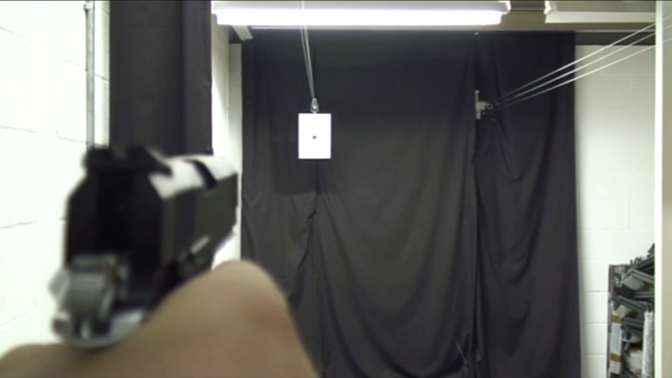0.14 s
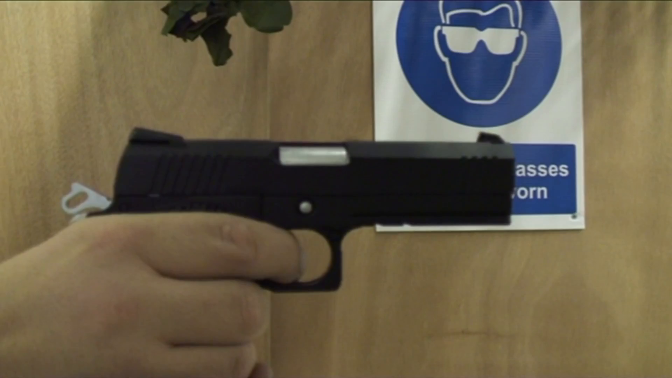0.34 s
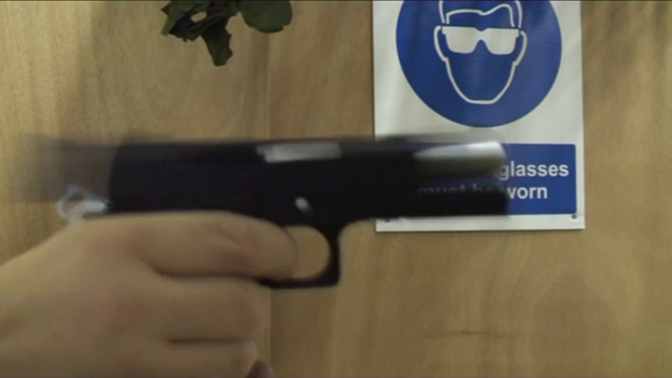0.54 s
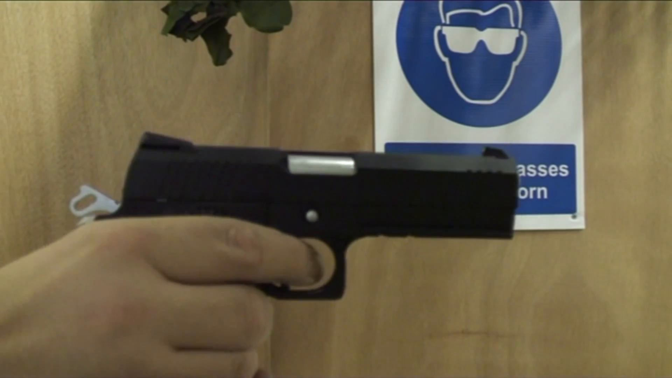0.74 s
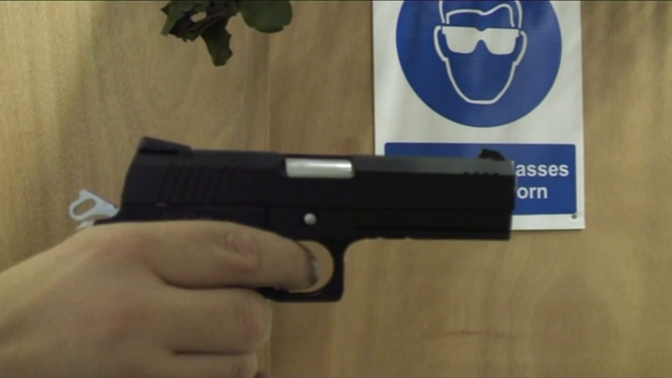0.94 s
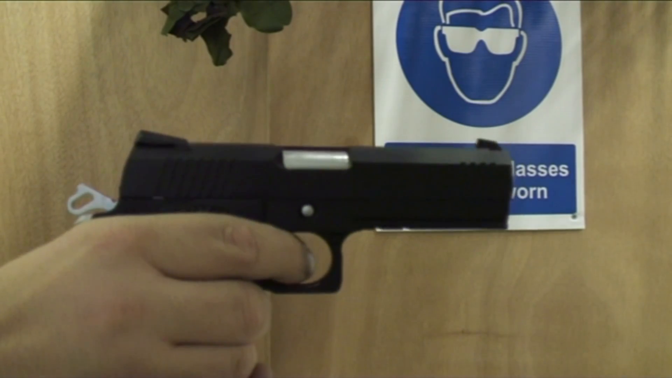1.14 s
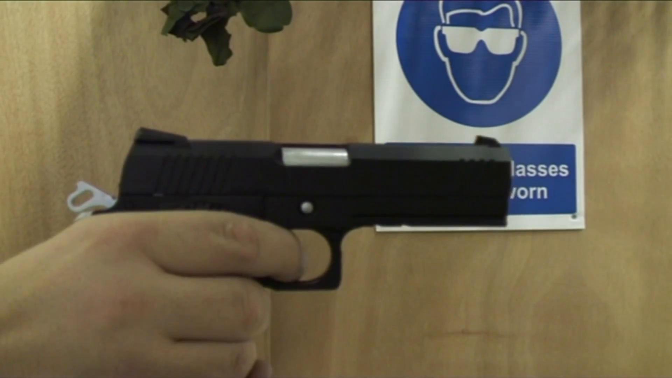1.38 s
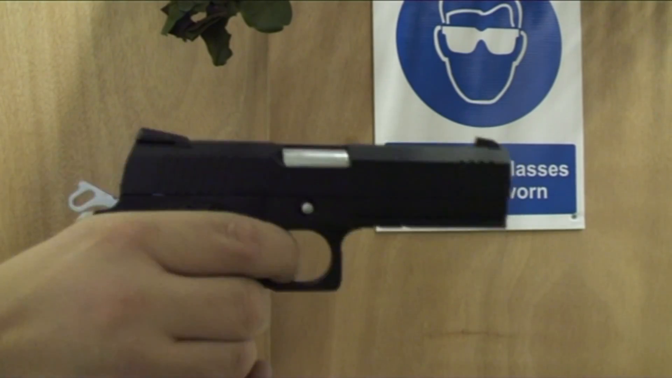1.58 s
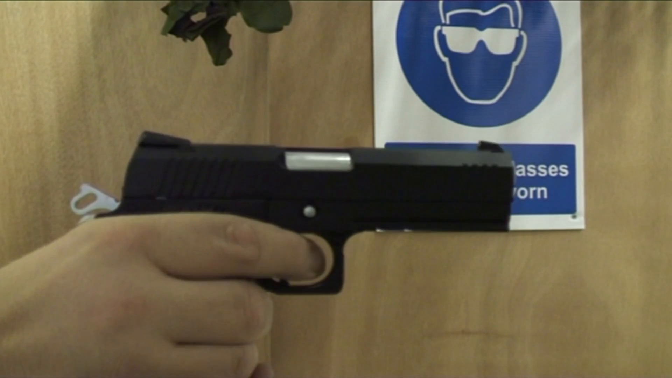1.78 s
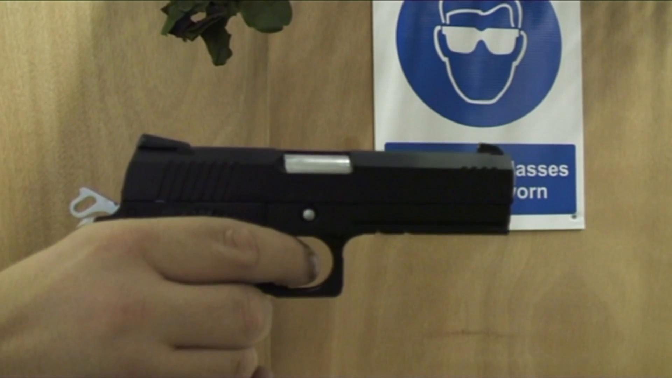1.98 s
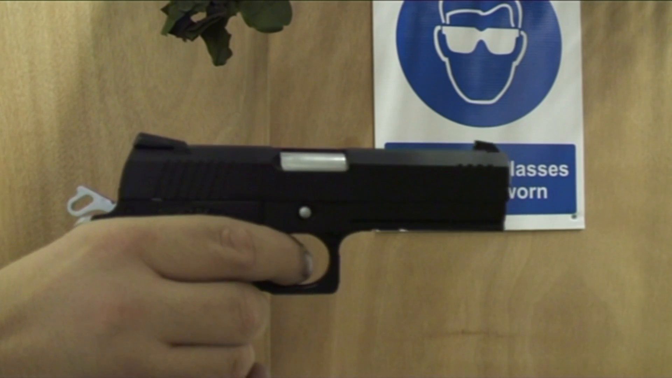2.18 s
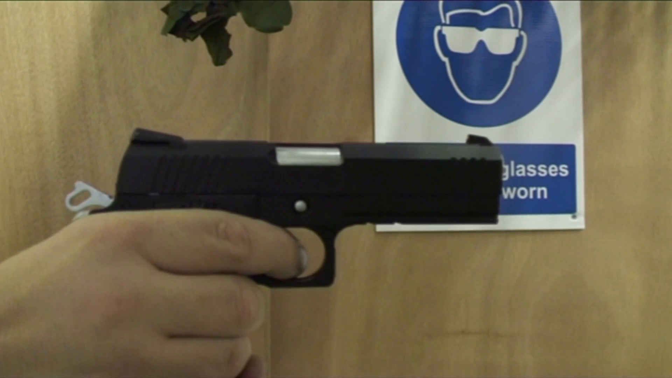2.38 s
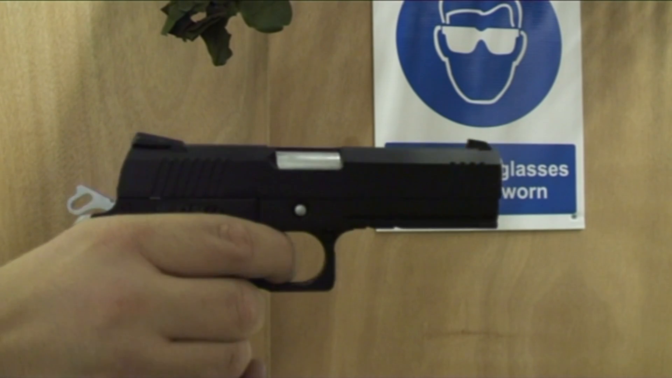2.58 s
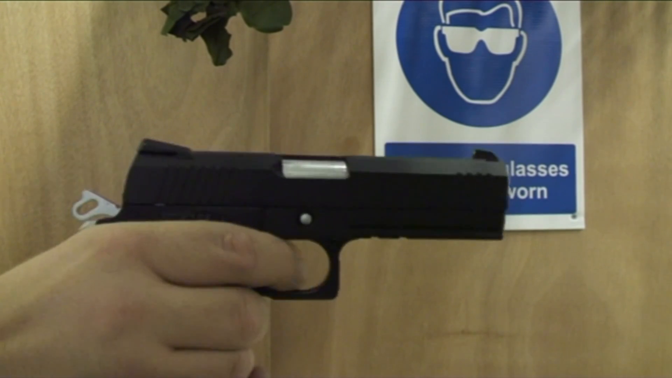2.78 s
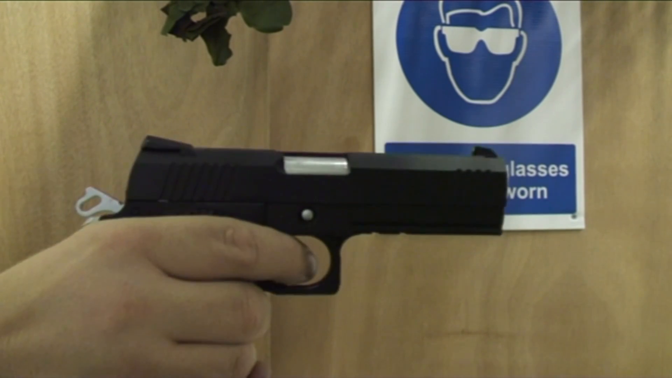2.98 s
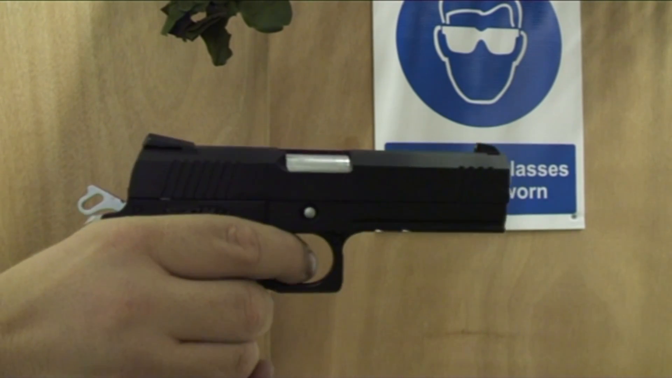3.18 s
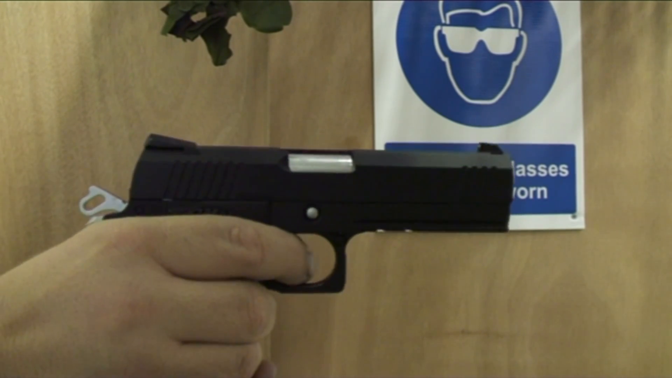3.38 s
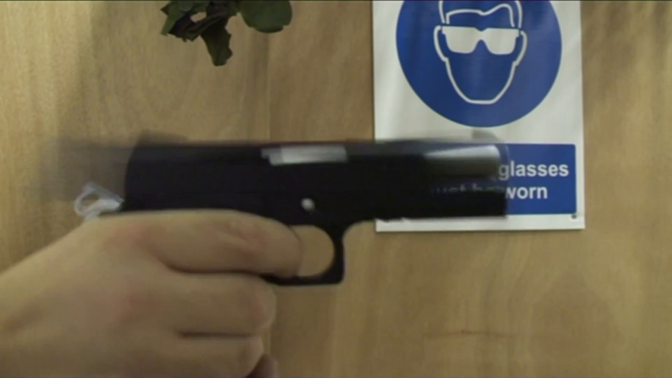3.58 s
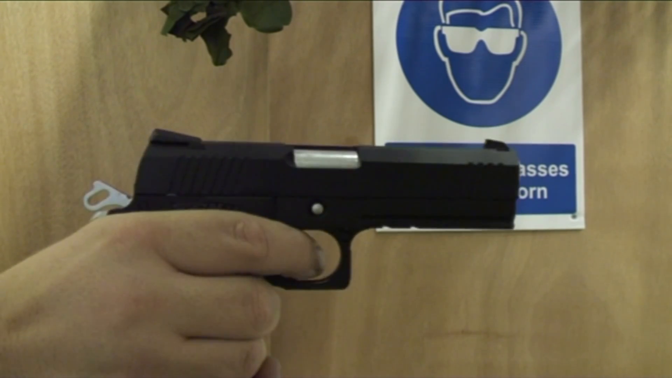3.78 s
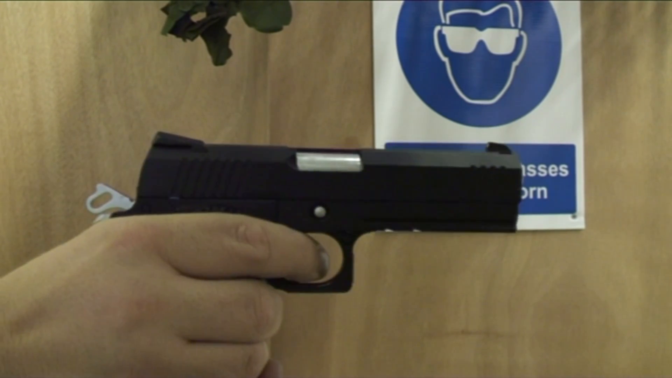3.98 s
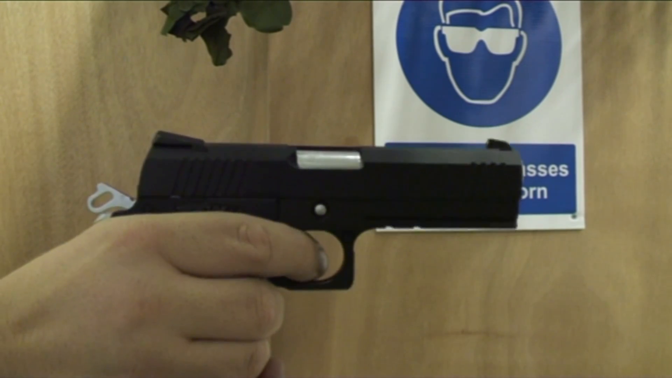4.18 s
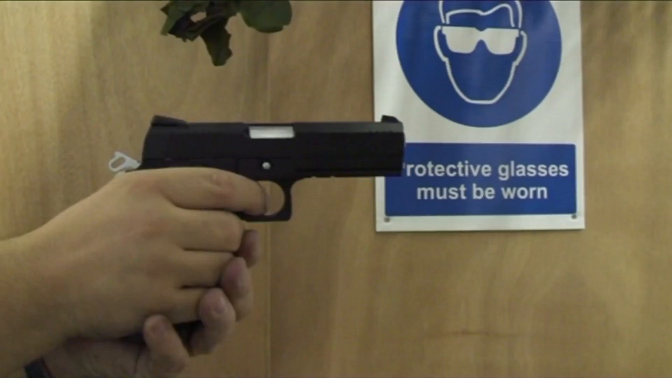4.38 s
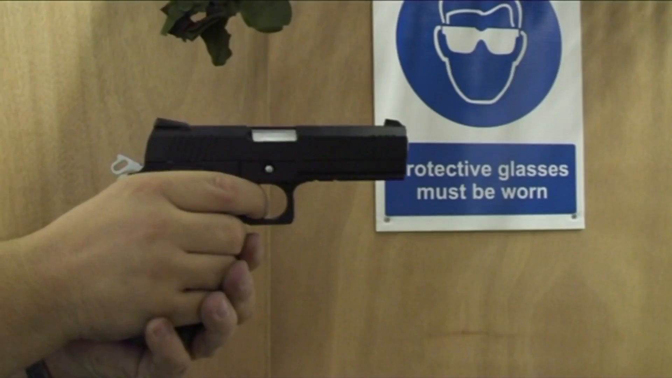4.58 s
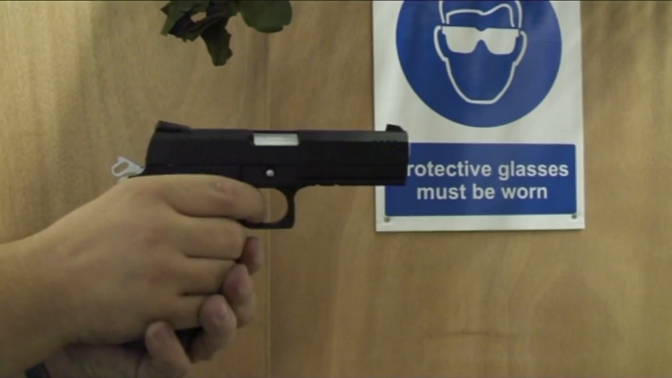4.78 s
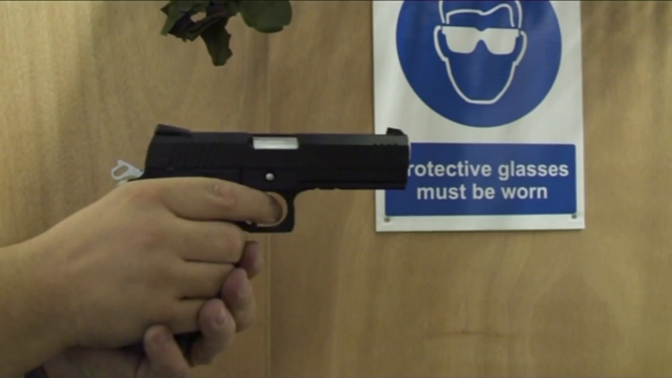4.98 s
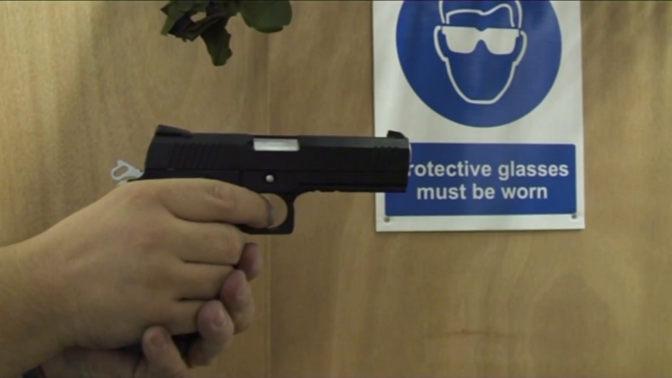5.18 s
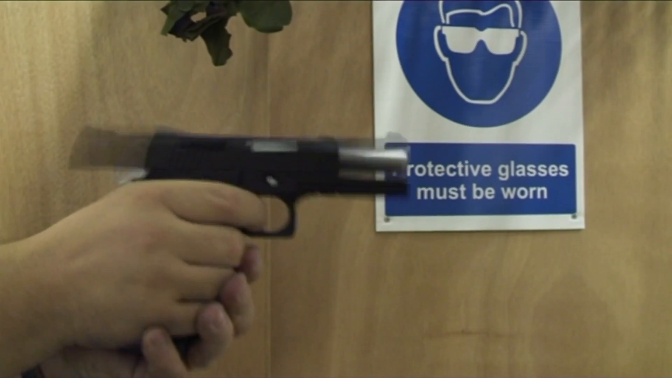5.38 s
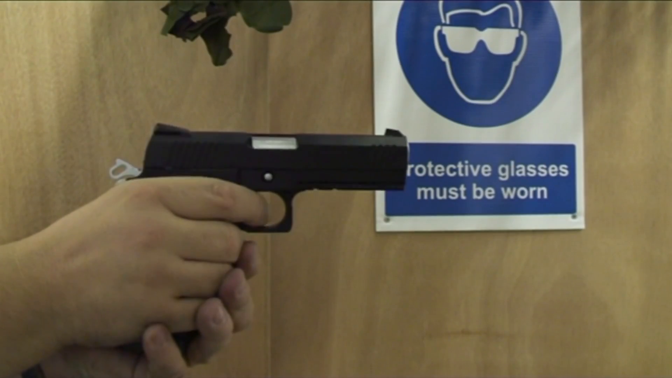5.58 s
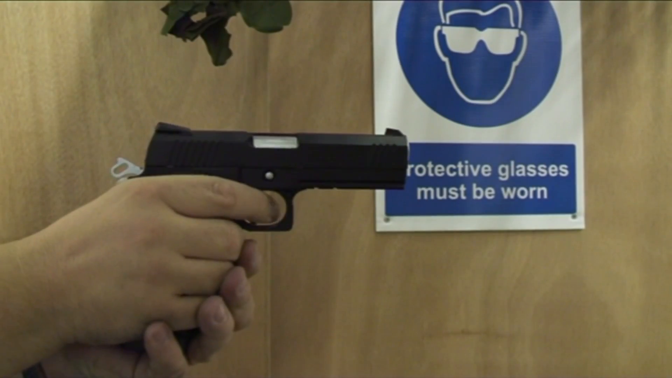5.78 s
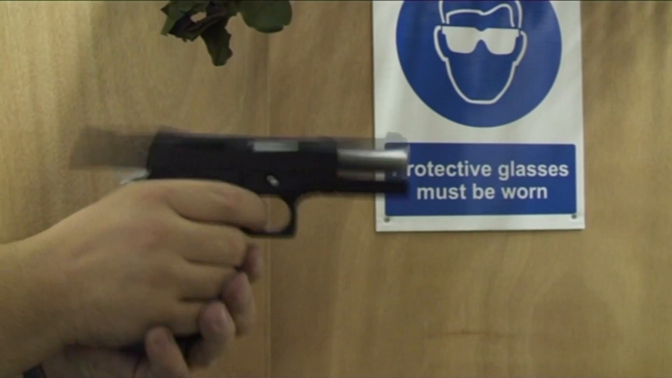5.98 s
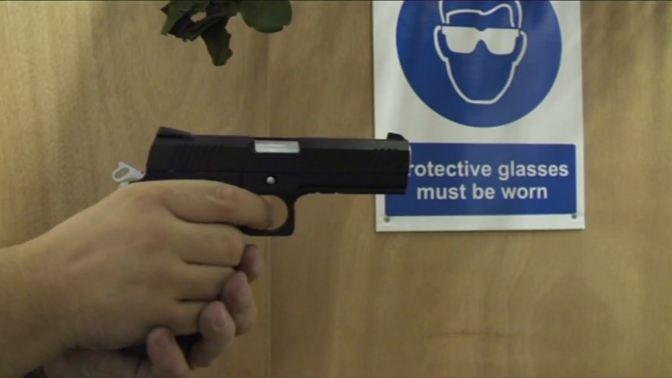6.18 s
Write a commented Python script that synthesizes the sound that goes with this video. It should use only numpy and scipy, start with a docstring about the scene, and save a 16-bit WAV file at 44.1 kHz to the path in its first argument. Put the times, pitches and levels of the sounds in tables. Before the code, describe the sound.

A gas-powered airsoft pistol cracks eight times in a reverberant indoor range, metal slide slamming sharply after each shot over a faint low hum.

```python
"""A pistol shot roars, heard from behind the gun, and its tail stops short; a faint hum, hiss and rumble run on.
Then a gas blowback airsoft pistol fires seven shots down a long indoor range, near an overloading microphone.
Each shot: hammer and slide blows are shaped noise and fading modes; gas bursts are pressure swings with a rush;
the slide feeds a pellet and slams, the range answers from its far end, and the pellet snaps at the target.
Trigger clicks, grip rustles and knocking spent pellets are short shaped noises between the shots."""
import sys
import numpy as np
from scipy import signal
from scipy.fft import rfft, irfft
from scipy.io import wavfile
from scipy.ndimage import uniform_filter1d

SR = 44100
rng = np.random.default_rng(int(sys.argv[2]) if len(sys.argv) > 2 else 0)


def store_pcm(level_fs):
    """Save levels as 16-bit WAV."""
    pcm = np.round(np.clip(level_fs, -1, 1) * 32767).astype(np.int16)
    wavfile.write(sys.argv[1], SR, np.atleast_2d(pcm).T)


N = 275184
T = np.arange(SR) / SR  # one second, the longest life of a single sound


def amp(db):
    """Decibels to gain."""
    return 10 ** (np.asarray(db) / 20)


def add(track, start_s, sound):
    """Mix a sound into a track from start_s; the excess is cut."""
    start = max(int(start_s * SR), 0)
    part = sound[:max(len(track) - start, 0)]
    track[start:start + len(part)] += part


def along(points, hz):
    """Interpolate (Hz, value) points on a log-frequency axis."""
    point_hz, value = np.transpose(points)
    return np.interp(np.log(hz + 1), np.log(point_hz), value)


def noise(spectrum, resonances=(), size=SR):
    """Random-phase noise of rms 1: a broad spectrum with resonances lifted or cut in dB."""
    hz = np.fft.rfftfreq(size, 1 / SR)
    level_db = along(spectrum, hz)
    for centre_hz, width_hz, lift_db in resonances:
        level_db = level_db + lift_db / (1 + ((hz - centre_hz) / width_hz) ** 4)
    phase = np.exp(2j * np.pi * rng.random(len(hz)))
    x = irfft(amp(level_db) * phase, size)
    return x / x.std()


def fade(t60_s, rise_s=0.00087):
    """Quick rise times exponential decay, 60 dB per t60_s."""
    return (1 - np.exp(-T / rise_s)) * np.exp(-np.log(1000) * T / t60_s)


def hump(centre_hz, below_db, above_db):
    """Spectrum that falls away on both sides of a centre."""
    return [(centre_hz / 100, below_db - 41.5), (centre_hz / 5, below_db), (centre_hz, 0), (centre_hz * 2, above_db)]


def grain(spread_db, size=24):
    """Uneven gain of rms 1, smoothed over half a millisecond: many tiny contacts or echoes."""
    wander = uniform_filter1d(rng.standard_normal(SR), size)
    gain = amp(spread_db * np.sqrt(size) * wander)
    return gain / np.sqrt(np.mean(gain ** 2))


# air hiss spectrum: freq_hz, density_db
AIR_SPECTRUM = [(40, -11.5), (200, -1.5), (400, -3.5), (1000, -7), (2000, -12), (5000, -16.5), (10000, -18),
                (14500, -18.5), (16000, -31)]
HUM_HZ, HUM_RMS_DB = 150.0, -55
AIR_RMS_DB, RUMBLE_RMS_DB = -64, -79.5


def background():
    """Steady electrical hum (a sine) over faint air hiss and rumble (noise)."""
    t = np.arange(N) / SR
    hum = np.sqrt(2) * amp(HUM_RMS_DB) * np.sin(2 * np.pi * HUM_HZ * t)
    rumble = amp(RUMBLE_RMS_DB) * noise([(20, 4.5), (120, -4.0), (300, -19.0), (1000, -50.5)], size=N)
    return hum + rumble + amp(AIR_RMS_DB) * noise(AIR_SPECTRUM, size=N)


# reverberation of the range: freq_hz, t60_s
RANGE_DECAY = [(100, 0.32), (450, .58), (900, 0.58), (2300, 0.64), (5500, 0.54), (8000, 0.46),
               (11000, 0.37), (15000, .29)]


def die_away(x):
    """Diffuse sound in the range, each band at its own t60: air and curtains take the treble first."""
    hz = np.fft.rfftfreq(SR, 1 / SR)
    spectrum, out = rfft(x), 0
    for (_, t60_s), share in zip(RANGE_DECAY, np.eye(len(RANGE_DECAY))):
        # triangular bands that sum to 1
        weight = along([(row[0], w) for row, w in zip(RANGE_DECAY, share)], hz)
        out = out + irfft(spectrum * weight, SR) * fade(t60_s)
    return out


# resonances of slide, barrel and frame, also used below: centre_hz, width_hz, lift_db
STEEL = [(2120, 130, 3), (2510, 200, 4), (2870, 120, 1.5), (3900, 83, 1.5), (4193, 320, 1.5),
         (5400, 150, 3), (6090, 450, 6), (7800, 220, 4.5), (9670, 210, 5.5), (11050, 220, 4.5),
         (11580, 260, 7), (13600, 240, -3.5), (14900, 300, -4.5)]
# spent pellets knocking about down the range: start_s, level_db, centre_hz
KNOCKS = [(1.235, -50.5, 2800), (3.2740, -39, 1200), (5.418, -52, 2500)]


def spent_pellets(tick_db=3.5, tick_hz=4000):
    """Each knock far off is a short tick and a wash of reverberation."""
    out = np.zeros(N)
    for start_s, level_db, centre_hz in KNOCKS:
        tick = noise(hump(tick_hz, -9, -14) + [(15000, -29)])
        add(out, start_s, amp(level_db + tick_db) * tick * fade(t60_s=.017, rise_s=.0002))
        wash = noise(hump(centre_hz, -4.5, -8.5) + [(4 * centre_hz, -20), (16000, -45)], STEEL)
        add(out, start_s, amp(level_db) * die_away(wash))
    return out


# trigger resets and takes up its slack: start_s, level_db, centre_hz
CLICKS = [(1.3678, -41.5, 6400), (1.4002, -43.5, 4750), (1.565, -49, 2790), (2.5765, -45.5, 4320),
          (2.702, -48, 2990), (3.5022, -44.5, 6080), (4.3337, -52.5, 9000), (4.3926, -48.5, 4650),
          (5.3295, -41, 6900), (5.3400, -40, 6900), (5.979, -41, 8950), (5.9915, -45, 9100)]
# resonances of the trigger parts: centre_hz, width_hz, lift_db
TRIGGER = [(2800, 100, 10.5), (4400, 100, 14), (5230, 100, 4), (6100, 130, 9), (9200, 250, 5),
           (11360, 300, 10)]
# faint high rustles as the grip shifts: start_s, level_db
RUSTLES = [(2.2663, -56.5), (3.2150, -58), (3.57, -57), (4.0338, -54)]
CLICK_T60_S = .02
RUSTLE_HZ, RUSTLE_T60_S = 11300, 0.34


def handling():
    """Close by: dry trigger clicks (resonant noise bursts) and grip rustles (grainy noise)."""
    out = np.zeros(N)
    decay = fade(CLICK_T60_S, rise_s=.0002) + amp(-30) * fade(t60_s=.3)
    for start_s, level_db, centre_hz in CLICKS:
        add(out, start_s, amp(level_db) * noise(hump(centre_hz, -10.5, -11.0), TRIGGER) * decay)
    for start_s, level_db in RUSTLES:
        rustle = noise(hump(RUSTLE_HZ, -12, -12.5)) * grain(2.5) * fade(RUSTLE_T60_S)
        add(out, start_s, amp(level_db) * rustle)
    return out


def ring(modes, rise_s=0.00029):
    """Fading modes whose pitch and strength vary a little from blow to blow."""
    out = 0
    for pitch_hz, level_db, t60_s in modes:
        detune, force = rng.standard_normal(2)
        cycles = pitch_hz * (1 + .008 * detune) * T + rng.random()
        out = out + amp(level_db + 2 * force) * fade(t60_s, rise_s) * np.sin(2 * np.pi * cycles)
    return out


# metal contact spectrum, also used below: freq_hz, density_db
CLACK_SPECTRUM = [(40, -34.5), (150, -21.5), (400, -3.5), (900, -5.5), (1400, -9), (2200, -2), (4500, 0.5),
                  (6500, -2.5), (8500, -4.5), (12000, -5.5), (14000, -11), (16000, -14.5)]
# free ring of slide and frame, before random variation: pitch_hz, level_db, t60_s
GUN_MODES = [(2070, -10, .045), (2400, -10, 0.046), (2970, -18.5, 0.068), (4160, -9, 0.023),
             (5180, -8.5, 0.038), (6370, -14.5, .04), (11800, -20, 0.046)]


def clack(t60_s, ring_db=0):
    """Metal meets metal: hard first contact, chattering crash and the gun's own ring."""
    contact = fade(t60_s, rise_s=.0004) + .4 * fade(t60_s / 5, rise_s=.0001)
    crash = noise(CLACK_SPECTRUM, STEEL) * grain(3) * contact
    return crash + amp(ring_db) * ring(GUN_MODES)


# range roar heard from behind the gun: freq_hz, density_db
BEHIND_SPECTRUM = [(30, -14.5), (100, -23), (200, -6.5), (400, 0.5), (800, 4), (1400, -1.5), (2500, -5),
                   (4500, -5), (6200, -4.5), (8500, -12), (12000, -11.5), (15500, -24)]


def opening_shot(level_db=3.0, near_db=-5, far_s=.034, stop_s=0.3346, stop_db=-18, end_s=.374):
    """A shot heard from behind the gun, where the range roars far louder; its tail stops short."""
    swell = np.interp(T, [far_s, far_s + .004], [amp(near_db), 1])
    out = amp(level_db) * die_away(noise(BEHIND_SPECTRUM, STEEL)) * swell
    add(out, .012, amp(2.0) * clack(t60_s=.07))
    stop_times_s = [stop_s, stop_s + .003, end_s, end_s + 0.0027]
    return out * np.interp(T, stop_times_s, [1, amp(stop_db), amp(stop_db), 0])


# spectrum of the range's answer: freq_hz, density_db
RANGE_SPECTRUM = [(60, -46.5), (130, -44.5), (190, -4), (270, -9), (340, -6), (480, 1.5), (680, 3),
                  (1000, -4), (1400, -4.5), (2500, -5.5), (5500, -7.5), (8500, -14.5), (12000, -17),
                  (15500, -34)]
# low resonances of the range: centre_hz, width_hz, lift_db
ROOM = [(193, 19, 2), (346, 12, 8.5), (452, 22, 2), (634, 12, 1), (748, 5, 4.5), (913, 89, 4.5),
        (1064, 16, 4.5)]


def range_answer(echoes, near_db=-16.5, near_t60_s=0.61, far_db=-6.5, far_delay_s=.086,
                 far_rise_s=0.069, first_gain=0.19):
    """Nearby walls ring at once; the far end returns later and swells as its echoes pile up."""
    out = amp(near_db) * noise(RANGE_SPECTRUM, ROOM) * fade(near_t60_s, rise_s=.004)
    swell = 1 - (1 - first_gain) * np.exp(-T / far_rise_s)
    # the echo pattern partly repeats from shot to shot, as the gun hardly moves
    pattern = (echoes + noise(RANGE_SPECTRUM, STEEL + ROOM)) / np.sqrt(2)
    add(out, far_delay_s, amp(far_db) * die_away(pattern * grain(1.5)) * swell)
    return out


# gas rush spectrum: freq_hz, density_db
GAS_SPECTRUM = [(30, -25), (100, -27.5), (200, -5), (400, 4), (800, -1), (1200, -8), (3000, -7.5),
                (8000, -16.5), (16000, -33.5)]


def puff(swing_hz, t60_s, rush_db, rush_t60_s):
    """Released gas: a pressure swing and its turbulent rush."""
    swing = np.sin(2 * np.pi * swing_hz * T) * fade(t60_s)
    return swing + amp(rush_db) * noise(GAS_SPECTRUM) * fade(rush_t60_s)


# barrel whistle as the gas leaves, before random variation: pitch_hz, level_db, t60_s
BARREL_MODES = [(2610, 3, 0.011), (4170, -8.5, 0.026), (6100, -2, 0.017)]


def blast(echoes, blast_db, range_db):
    """Gas leaves the muzzle, then the breech; loose parts buzz and the range answers."""
    out = amp(blast_db - 0.5) * puff(swing_hz=838, t60_s=0.012, rush_db=-2, rush_t60_s=0.034)  # muzzle
    add(out, .0008, amp(blast_db + 2.0) * ring(BARREL_MODES, rise_s=0.0024))
    breech = puff(swing_hz=557, t60_s=0.013, rush_db=-7.5, rush_t60_s=0.06)
    add(out, .012, amp(blast_db + 0.6) * breech)
    slow_swing = -amp(blast_db - 22) * fade(t60_s=0.32, rise_s=0.0054)
    buzz = noise(CLACK_SPECTRUM, STEEL) * grain(1.7) * fade(t60_s=.45, rise_s=0.011)
    out = out + slow_swing + amp(-14 + range_db / 2) * buzz
    return out + amp(range_db) * range_answer(echoes)


def scrape(lead_s=.03, t60_s=.09):
    """The slide runs home along its rails for lead_s, louder as it gathers speed."""
    growth = np.exp(np.log(1000) * np.minimum(T - lead_s, 0) / t60_s)
    return noise(CLACK_SPECTRUM, STEEL) * grain(3) * growth * (T < lead_s)


FEED_SHARE = .75  # fraction of the cycle at which the slide strips a pellet
FEED_DB, FEED_DB_PER_BLAST_DB = -5.5, 1.5
SLAM_DB, SCRAPE_DB = -3, -12  # the recoil spring closes the slide equally hard every time


def slide_return(cycle_s, blast_db, run_up_s=.025):
    """The recoil spring drives the slide forward: it feeds a pellet, scrapes home and slams."""
    out = np.zeros(SR)
    feed_db = FEED_DB + FEED_DB_PER_BLAST_DB * blast_db
    add(out, FEED_SHARE * cycle_s, amp(feed_db) * clack(t60_s=0.017, ring_db=-13.0))
    add(out, cycle_s - run_up_s, amp(SCRAPE_DB) * scrape(run_up_s, t60_s=0.091))
    add(out, cycle_s, amp(SLAM_DB) * clack(t60_s=0.04, ring_db=1.5))
    return out


# pellet strike spectrum: freq_hz, density_db
SNAP_SPECTRUM = [(100, -35), (1000, -10), (3000, 7.5), (7000, 5), (12000, -2.5), (15500, -7)]
TARGET_DB, TARGET_DB_PER_BLAST_DB = -17, 1.7


def target_snap(blast_db):
    """A pellet snaps through the target, softer as the gas weakens."""
    snap = noise(SNAP_SPECTRUM) * grain(4.7) * fade(t60_s=0.02, rise_s=0.00028)
    return amp(TARGET_DB + TARGET_DB_PER_BLAST_DB * blast_db) * snap


# shots: valve_opens_s, range_answer_db, then after the valve: slide_shut_s, pellet_at_target_s
SHOTS = [(0.6119, 3, 0.063, 0.18), (1.5932, 1, .0644, 0.2), (2.723, 0.5, 0.061, .1934),
         (3.6443, -1.5, 0.064, 0.21), (4.7695, 1, .0627, .192), (5.4906, -1.5, 0.062, 0.22),
         (6.0917, -3.5, 0.065, 0.25)]
# hammer, valve, unlocking, rear stop, rebound: delay_after_valve_s, level_re_blast_db, t60_s
BLOWS = [(-.0054, -11, 0.039), (.0002, 0, 0.034), (.0120, -7.5, 0.03), (0.0154, -5, .04), (.0232, -10, .02)]
FIRST_BLAST_DB, COOLING_DB_PER_SHOT = 3, 0.59  # the magazine chills, so each shot has less gas pressure


def pistol():
    """Every shot runs the same cycle: metal blows, blast, slide return, pellet on target."""
    out = np.zeros(N)
    echoes = noise(RANGE_SPECTRUM, STEEL + ROOM)  # shared by all shots
    for fired, (start_s, range_db, cycle_s, flight_s) in enumerate(SHOTS):
        blast_db = FIRST_BLAST_DB - COOLING_DB_PER_SHOT * fired
        for delay_s, level_db, t60_s in BLOWS:
            add(out, start_s + delay_s, amp(blast_db + level_db) * clack(t60_s, ring_db=-15.0))
        add(out, start_s, blast(echoes, blast_db, range_db))
        add(out, start_s, slide_return(cycle_s, blast_db))
        add(out, start_s + flight_s, target_snap(blast_db))
    return out


def scene():
    """All sources at one microphone, the same in both ears."""
    out = background() + spent_pellets() + handling() + pistol()
    add(out, 0, opening_shot())
    return np.array([out, out])


TOP_HZ = 15700


def record(dry, ceiling=0.87, lopsided=0.041, block_hz=4):
    """The input overloads a little unevenly, which leaves a slow thump after each shot; the top is cut."""
    clipped = dry / (1 + (dry / ceiling) ** 4) ** (1 / 4)
    uneven = clipped - lopsided * clipped ** 2
    dc_block = signal.butter(2, block_hz, "high", fs=SR, output="sos")
    top_cut = signal.ellip(10, .1, 70, TOP_HZ, fs=SR, output="sos")
    return signal.sosfilt(top_cut, signal.sosfilt(dc_block, uneven))


dry = scene()
out = record(dry)
store_pcm(out)
```